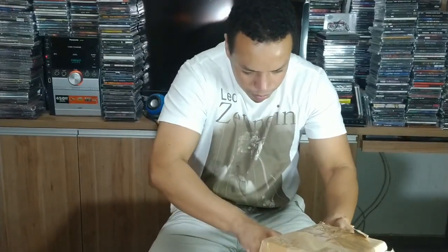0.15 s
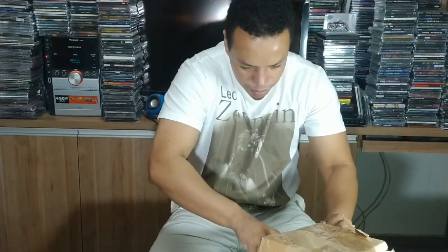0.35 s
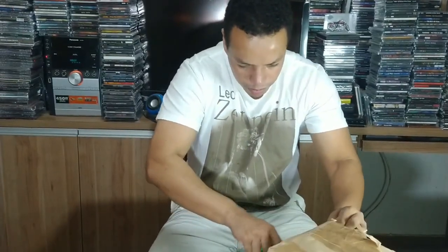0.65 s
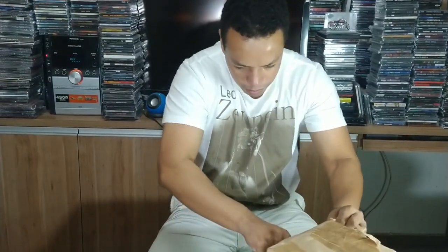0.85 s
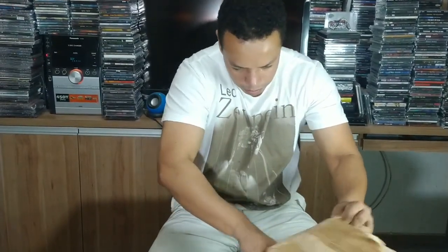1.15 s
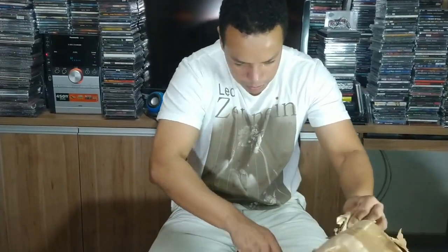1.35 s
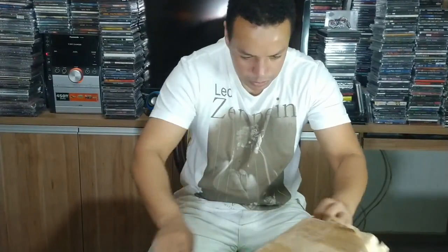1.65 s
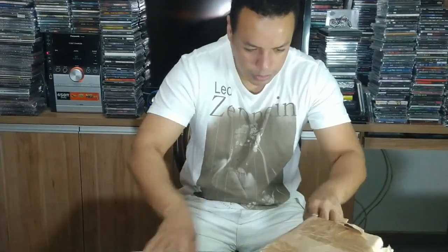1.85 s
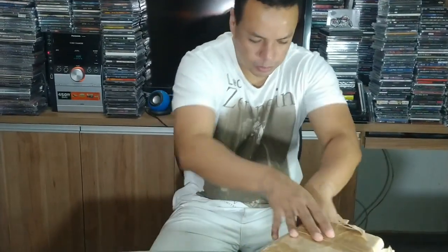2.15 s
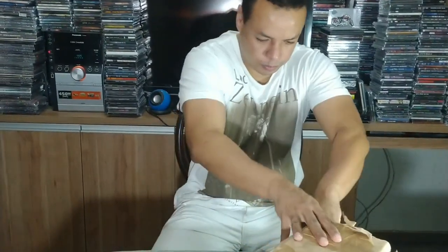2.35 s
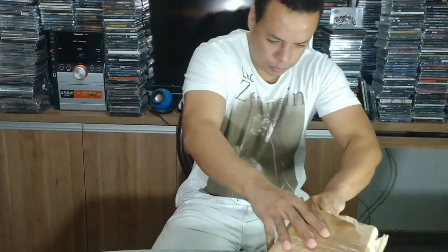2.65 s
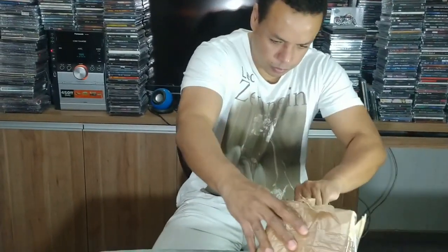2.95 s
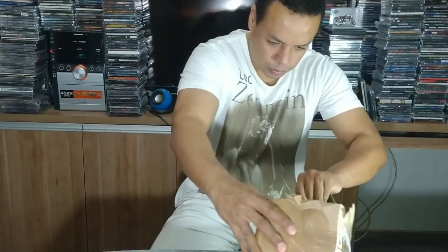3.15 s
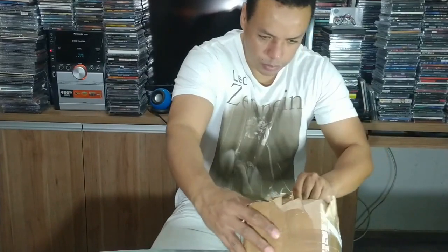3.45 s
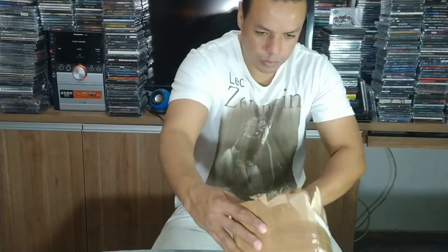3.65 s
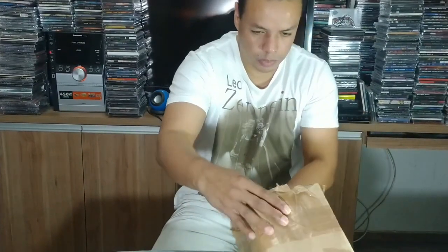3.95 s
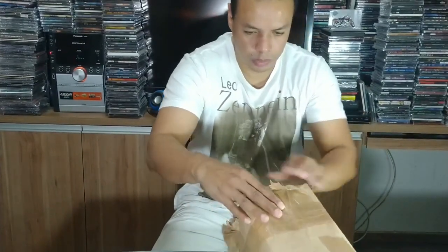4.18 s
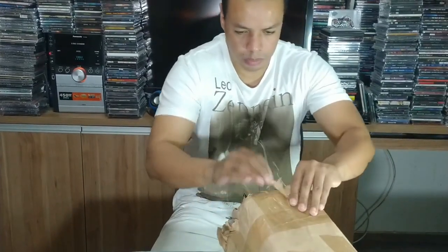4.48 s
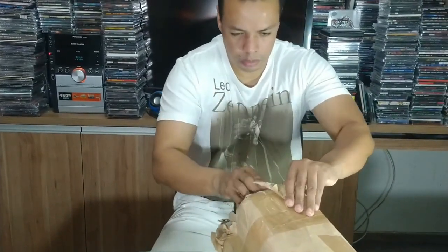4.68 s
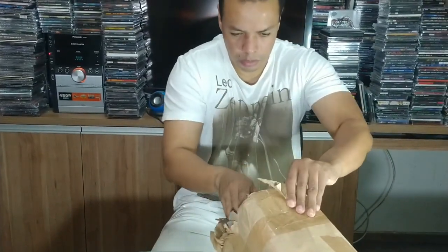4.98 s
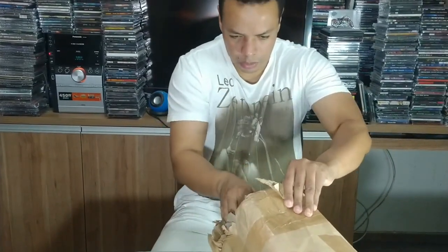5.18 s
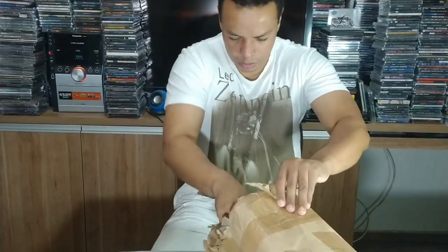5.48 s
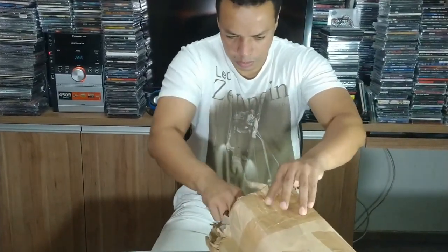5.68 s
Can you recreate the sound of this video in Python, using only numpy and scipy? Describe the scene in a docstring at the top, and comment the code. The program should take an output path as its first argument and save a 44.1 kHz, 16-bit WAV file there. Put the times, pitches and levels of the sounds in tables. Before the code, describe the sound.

In a small quiet room with a low appliance hum, thick wrapping paper is handled nearby. A few crisp ticks, one sharp pop and a dull jolt come first; near silence follows. Then loud tearing snaps, scattered softer rustling, and a dense closing burst of papery pops, in wide stereo with short reflections.

```python
"""Hands crinkle and tear brown paper off a parcel in a small, quiet room with a humming appliance.
Filtered noise and steady sines run throughout; early crinkling brings a hollow pop, then a short thudding jolt.
After a lull come the hardest snaps (brief rings with noise), then softer crackle (clumped grains of noise),
then a last flurry of snaps and buckling pops. Decaying noise echoes each sound in the room.
The camera widens its stereo by feeding each side, late and inverted, into the other."""
import sys
import numpy as np
from scipy import signal
from scipy.fft import rfft, irfft, next_fast_len
from scipy.io import wavfile
from scipy.ndimage import map_coordinates

SR = 44100
rng = np.random.default_rng(int(sys.argv[2]) if len(sys.argv) > 2 else 0)


def makeup_ratio(level_db):
    """Linear amplitude ratio for a level in decibels (20 dB per factor of ten)."""
    decades = np.asarray(level_db, float) / 20
    return 10 ** decades


def master(y):
    """Save y as 16-bit WAV."""
    cut = np.clip(np.atleast_2d(y).T, -1, 1)
    pcm = np.round(cut * 32767)  # scale
    wavfile.write(sys.argv[1], SR, pcm.astype(np.int16))


N = 256641


def unit(x):
    """Scaled to rms 1."""
    return x / np.sqrt(np.mean(x ** 2) + 1e-20)


def along(points, hz):
    """(Hz, value) points read on a log frequency axis."""
    point_hz, value = np.transpose(points)
    return np.interp(np.log(hz + 1), np.log(point_hz + 1), value)


def filtered(x, response):
    """x times a complex response of frequency."""
    m = next_fast_len(N + 8192)
    return irfft(rfft(x, m) * response(np.fft.rfftfreq(m, 1 / SR)), m)[..., :N]


def wander(nodes_per_s):
    """Smooth random curve through normal draws."""
    return map_coordinates(rng.standard_normal(N // 100), [np.arange(N) * nodes_per_s / SR])


def grains(spectrum, per_s, clump_db):
    """Tiny clicks of uneven size that come in clumps, rms 1."""
    hit = rng.random(N) < per_s / SR
    clicks = hit * rng.standard_normal(N) * makeup_ratio(clump_db * wander(60))
    return unit(filtered(clicks, lambda hz: makeup_ratio(along(spectrum, hz))))


def bursts(events, cycles, rough, edge, gain_db, crackle_s=0):
    """Each event rings a few cycles and may crackle on; too small a patch to radiate far below its pitch."""
    out, t = np.zeros(N + SR), np.arange(SR // 10) / SR
    for s, db, hz in events:
        ring = np.sin(2 * np.pi * hz * t) * np.exp(-t * hz / cycles)
        noise = rng.standard_normal(len(t)) * np.exp(-t / (cycles / hz + crackle_s))
        ring = ring + rough * noise
        highpass = signal.butter(4, edge * hz, "high", fs=SR, output="sos")
        lowpass = signal.butter(3, min(1.9 * hz, 17000), fs=SR, output="sos")
        ring = signal.sosfilt(lowpass, signal.sosfilt(highpass, ring))
        out[round(s * SR):][:len(t)] += makeup_ratio(db + gain_db) * ring / np.abs(ring).max()
    return out[:N]


# Room air spectrum. Each row: frequency in Hz, relative density in dB per Hz.
AIR = [(30, -46), (80, -44), (140, 14), (300, 7), (600, 12), (1200, -2.5), (2500, -4), (4500, -24),
       (9000, -56.5), (15500, -9)]
# Left-right likeness of the air. Each row: frequency in Hz, correlation from 0 to 1.
AIR_ALIKE = [(60, 0.217), (150, 0.17), (300, 0.66), (700, 0.116)]


def room_air():
    """Noise alike at both ports in part: mid and side shares set the correlation at each frequency."""
    def mid_side_gain(hz):
        angle = np.arccos(np.clip(along(AIR_ALIKE, hz), -1, 1)) / 2
        return makeup_ratio(along(AIR, hz)) * [np.cos(angle), np.sin(angle)]
    mid, side = filtered(rng.standard_normal((2, N)), mid_side_gain)
    return makeup_ratio(-66.0) * unit(np.array([mid + side, mid - side]))


# Appliance tones ahead of the ports. Each row: frequency in Hz, left rms in dB, right rms in dB,
# left phase lead in radians.
HUM = [(42.7, -88, -98, .3), (57.2, -70.5, -75, -1.5), (89.2, -87, -83, .3), (114.4, -81, -76, .3),
       (119.9, -78, -81, .3), (171.6, -66, -67, -.3), (178.7, -77, -69, -.5), (239.9, -77, -87, .3),
       (286, -72, -73, -.9), (343.2, -89, -85, .3), (514.8, -84, -84, .3), (850, -82, -82, .3),
       (972, -84, -84, .3)]


def appliance_hum():
    """Steady sines, each with its own level and phase per side."""
    t, hum = np.arange(N) / SR, np.zeros((2, N))
    for hz, left_db, right_db, lead_rad in HUM:
        phase = 2 * np.pi * (hz * t + rng.random()) + [[lead_rad], [0]]
        hum += makeup_ratio([[left_db], [right_db]]) * np.sqrt(2) * np.sin(phase)
    return hum


# Echo decay. Each row: frequency in Hz, t60 in seconds.
ROOM_T60 = [(200, 0.21), (800, 0.23), (3000, 0.22), (8000, 0.27), (15000, 0.29)]
# Left-right likeness of the echo. Each row: frequency in Hz, correlation from 0 to 1.
ECHO_ALIKE = [(250, .85), (700, .1)]


def room(x):
    """Walls answer after a few ms; as the hands move, every stretch gets its own echo pattern."""
    out, step = np.zeros((2, N + 2 * SR)), SR // 8
    for start in range(0, N, step):
        hz, t, z = signal.stft(rng.standard_normal((2, SR // 2)), SR, nperseg=256)
        alike = along(ECHO_ALIKE, hz)[:, None]
        z = np.array([z[0], alike * z[0] + np.sqrt(1 - alike ** 2) * z[1]])
        decay = makeup_ratio(-60 * t / along(ROOM_T60, hz)[:, None])
        tail = signal.istft(z * decay, SR, nperseg=256)[1]
        tail = tail * (1 - np.exp(-np.arange(tail.shape[1]) / SR / .005))  # 5 ms build-up
        wet = signal.fftconvolve(x[None, start:start + step], tail / np.linalg.norm(tail[0]), axes=1)
        out[:, start:start + wet.shape[1]] += wet
    return out[:, :N]


# Parcel knocked on the lap. Each row: start in seconds, relative peak in dB, pitch in Hz.
THUDS = [(0.656, -38.5, 297), (1.285, -27, 219), (1.297, -25, 261.4), (1.322, -32.5, 251), (2.6, -37, 344)]


def thuds():
    """Low, quickly damped rings with some noise."""
    return bursts(THUDS, cycles=1.8, rough=0.4, edge=0.7, gain_db=-3.5)


# Air pockets under the wrapping. Each row: start in seconds, relative peak in dB, pitch in Hz.
HOLLOWS = [(0.37, -56, 1008), (0.696, -24, 737), (0.704, -39, 670), (0.698, -27, 1534), (1.06, -49, 1680),
           (2.63, -33.5, 630.5), (2.679, -31, 760), (2.722, -32.5, 805), (2.912, -44.5, 1670),
           (2.976, -45, 835), (3.128, -41, 1240), (3.19, -46, 1204), (3.378, -29.5, 1923),
           (3.432, -39, 834), (3.85, -48, 1640), (3.985, -50, 632), (4.82, -56, 1002), (4.934, -40.5, 851),
           (4.938, -49, 623), (5.46, -38, 1270)]


def hollows():
    """Trapped air rings on for many cycles."""
    return bursts(HOLLOWS, cycles=9.1, rough=0.31, edge=0.89, gain_db=-0.5)


# Sheet buckling. Each row: start in seconds, relative peak in dB, pitch in Hz.
POPS = [(0.368, -49.5, 990), (0.6579, -34, 705), (0.6941, -11.5, 937), (0.718, -40, 1070),
        (1.2788, -33, 790), (1.286, -23.5, 940), (2.6163, -17, 743), (2.6629, -22, 715), (2.6776, -14, 750),
        (2.7201, -27, 805), (2.7685, -17.5, 942), (2.902, -38, 1420), (2.976, -47, 930),
        (3.1276, -29.5, 1380), (3.179, -27.5, 1577), (3.428, -22, 1255), (3.9908, -54, 670),
        (4.308, -58, 1130), (4.933, -37, 800), (5.4558, -20.5, 1560), (5.581, -25.5, 1290),
        (5.6268, -23.5, 1630), (5.66, -24.5, 1170), (5.6796, -16.5, 1410), (5.701, -12.5, 1375),
        (5.7567, -18.5, 1040), (5.812, -28, 803)]


def pops():
    """Buckling gives half-cycle decays, nearly free of noise."""
    return bursts(POPS, cycles=0.5, rough=0.06, edge=0.66, gain_db=-4.0)


# Handfuls crumpled or pulled. Each row: peak time in seconds, swell in seconds per 20 dB (8 ms at least),
# relative levels in dB of fibre crackle, crease rattle and sheet flutter.
CRUMPLES = [(0.022, 0.05, -64, -91, -85), (0.28, 0.01, -51.5, -68, -91), (0.36, 0.0149, -44, -47, -74),
            (0.49, 0.0244, -45.5, -71, -69), (0.56, -0.03, -62, -70, -78), (0.623, 0.03, -50, -57.5, -75),
            (0.659, 0.0124, -33, -33.5, -46.5), (0.68, 0.0179, -44, -42, -59.5),
            (0.698, 0.0014, -30.5, -25, -26.5), (0.72, -0.0046, -38.5, -40, -42),
            (0.76, -0.0152, -64, -45, -37), (1.07, 0.04, -52, -64, -65), (1.147, 0.0853, -45, -69, -99),
            (1.196, -0.01, -39.5, -83, -84), (1.292, 0.0231, -29, -34, -33),
            (1.308, 0.0145, -39, -38.5, -32.5), (1.357, 0.06, -54, -53.5, -61), (2.1, -0.2, -70, -89, -92),
            (2.304, 0.07, -49.5, -74.5, -78), (2.501, 0.13, -51.5, -57, -62),
            (2.532, 0.02, -51.5, -48, -56.5), (2.57, 0.05, -41, -48.5, -59), (2.607, 0.0215, -41, -36, -39),
            (2.622, -0.0041, -25.5, -24, -26.5), (2.684, 0.0267, -25.5, -26, -33.5),
            (2.775, -0.0013, -32.5, -35.5, -28), (2.907, 0.0262, -38.5, -42, -42),
            (2.939, 0.03, -40.5, -43.5, -55), (2.985, 0.0631, -39.5, -41.5, -53),
            (3.069, 0.026, -37.5, -40, -44.5), (3.126, 0.0151, -27, -35.5, -38.5),
            (3.186, 0.015, -30, -38, -31.5), (3.218, 0.0437, -45.5, -50, -43.5),
            (3.31, 0.2145, -45.5, -54, -61.5), (3.371, 0.004, -34, -45.5, -66),
            (3.392, 0.0631, -35, -39, -49.5), (3.435, 0.0213, -31.5, -33.5, -33),
            (3.68, 1.1, -57.5, -89.5, -87), (3.82, 0.22, -50, -63, -65.5), (3.862, 0.07, -43.5, -41.5, -78),
            (3.987, 0.02, -46.5, -49, -61.5), (4.1, 0.37, -54.5, -70, -80), (4.162, 0, -48, -57, -66),
            (4.225, 0.0349, -44.5, -58.5, -82), (4.315, -0.0329, -42, -45, -49),
            (4.351, -0.04, -42.5, -58, -68), (4.448, 0.03, -49, -60.5, -70),
            (4.617, -0.19, -62.5, -52, -56.5), (4.67, 0.03, -49, -74, -80), (4.86, 0, -53.5, -56.5, -62),
            (4.934, 0, -47, -43.5, -45), (4.966, 0.01, -51.5, -55, -67), (5.137, -0.05, -49, -54, -68),
            (5.19, 0.1, -56, -69.5, -72), (5.275, 0, -49, -59, -73), (5.327, 0.1, -51, -60, -83),
            (5.457, -0.02, -38.5, -43.5, -34.5), (5.489, 0, -40.5, -53, -34),
            (5.545, 0.06, -50.5, -53, -49.5), (5.586, -0.025, -41.5, -41, -29),
            (5.627, -0.02, -41, -37.5, -34), (5.694, 0.0524, -38, -36, -27),
            (5.746, 0.03, -35.5, -36.5, -28), (5.81, 0.03, -38, -28.5, -30)]
# Parcel merely held: relative levels in dB of fibres, creases and sheet.
REST_DB = (-80.5, -79.5, -76.5)


def handling():
    """Each handful swells to its peak and dies away more slowly; three relative levels in dB."""
    s, swell_s, *levels = np.transpose(CRUMPLES)[:, :, None]
    tails = (1.45, 1.73, 2.08)  # dying away over swell: fibres, creases, sheet
    t = np.arange(0, N + 64, 64) / SR
    away = (t - s) / np.maximum(swell_s, .008)
    curves = []
    for db, tail, rest_db in zip(levels, tails, REST_DB):
        drop_db = 20 * np.where(away < 0, -away, away / tail)
        power = makeup_ratio(2 * rest_db) + makeup_ratio(2 * (db - drop_db)).sum(0)
        curves.append(np.interp(np.arange(N) / SR, t, 10 * np.log10(power)))
    return curves


# Fibre grain spectrum. Each row: frequency in Hz, relative density in dB per Hz.
FIBRES = [(2500, -42.5), (5000, 0), (8000, 4.5), (10500, 7.5), (13000, -1.5), (15500, -7.5)]
# Crease grain spectrum. Each row: frequency in Hz, relative density in dB per Hz.
CREASES = [(1000, -20.5), (1900, -3.5), (2800, 4.5), (4500, 5.5), (7500, -5), (12000, -53.5)]
# Sheet resonance. Each row: multiple of its pitch, relative level in dB.
SHEET = [(.12, -92), (.3, -39.5), (.62, -9.5), (.85, -4.5), (1.1, -5), (1.6, -3.5), (4, -18.5), (9, -63)]
# Pitches the sheet moves among, in Hz.
SHEET_HZ = [600, 800, 1050, 1400, 1850, 2400]


def sheet_flutter():
    """Grains through a sheet resonance that follows the buckling pitch, by fading between fixed pitches."""
    pop_s, _, pop_hz = np.transpose(POPS)
    pitch_hz = np.interp(np.arange(N) / SR, pop_s, pop_hz)
    near = np.array([np.exp(-(np.log(pitch_hz / hz) / .2) ** 2) for hz in SHEET_HZ])
    near = near / np.linalg.norm(near, axis=0)
    flutter = np.zeros(N)
    for share, hz in zip(near, SHEET_HZ):
        spectrum = [(hz * multiple, db) for multiple, db in SHEET]
        flutter += share * grains(spectrum, per_s=800, clump_db=2)
    return flutter


def rustle():
    """Handling drives three sizes of grain: fibres, creases and the whole sheet."""
    fibre_db, crease_db, sheet_db = handling()
    fibres = makeup_ratio(fibre_db) * grains(FIBRES, per_s=4000, clump_db=3)
    creases = makeup_ratio(crease_db) * grains(CREASES, per_s=1400, clump_db=2.5)
    return fibres + creases + makeup_ratio(sheet_db) * sheet_flutter()


def small_snaps(count):
    """Lesser creases give way at random moments, as loud as the handling allows."""
    when = rng.random(count)
    size, pitch = rng.standard_normal((count, 2)).T
    fibre_db = handling()[0][(when * N).astype(int)]
    db = fibre_db + 6 + 3 * size
    hz = np.minimum(7000 * np.exp(.3 * pitch), 13000)
    return np.transpose([when * N / SR, db, hz])


# Loudest creases snapping. Each row: start in seconds, relative peak in dB, centre in Hz.
SNAPS = [(0.313, -32, 10900), (0.3275, -29, 10800), (0.335, -40, 10500), (0.3399, -24, 9100),
         (0.3832, -38, 3430), (0.4695, -33, 10500), (0.5395, -32, 11100), (0.5595, -30.5, 10700),
         (0.618, -33, 10100), (0.6628, -16.5, 3230), (0.6935, -15.5, 2640), (0.6987, -17.5, 4450),
         (1.068, -44, 5500), (1.184, -37.5, 10200), (1.301, -24, 3300), (1.363, -43, 3200),
         (1.8104, -35.5, 9900), (2.0906, -43, 10600), (2.4883, -38.5, 10000), (2.5274, -30.5, 3000),
         (2.5666, -18.5, 9650), (2.616, -20, 8900), (2.6205, -13.5, 2760), (2.6215, -12, 7700),
         (2.6767, -18, 2900), (2.682, -12.5, 4940), (2.9018, -37, 2850), (2.903, -25, 8060),
         (2.91, -25, 10400), (2.936, -40, 7800), (2.985, -28, 2950), (3.063, -30, 8250),
         (3.0677, -30, 3100), (3.124, -30, 5400), (3.1285, -20, 9400), (3.133, -25.5, 3400),
         (3.1793, -12.5, 8730), (3.184, -37, 5240), (3.1868, -24, 2820), (3.191, -35, 3320),
         (3.28, -27, 9500), (3.29, -31, 10000), (3.428, -22.5, 3930), (3.43, -9, 7700), (3.4338, -11, 5350),
         (3.437, -15.5, 4640), (3.444, -11, 5500), (4.188, -34, 5640), (4.283, -35.5, 6450),
         (4.3087, -34, 3220), (4.3126, -28, 6500), (4.326, -41, 7550), (4.349, -37, 8000),
         (4.489, -38, 8200), (4.6715, -48, 8350), (4.6893, -45, 9300), (4.7729, -26.5, 7350),
         (4.935, -30, 5140), (4.9402, -30, 4900), (4.989, -31, 6560), (5.1218, -34, 4870),
         (5.1355, -26.5, 5070), (5.181, -31, 8500), (5.1855, -28, 9200), (5.2716, -25, 3960),
         (5.322, -28.5, 5300), (5.455, -33, 2920), (5.481, -28, 2980), (5.581, -26, 2680),
         (5.659, -19, 2540), (5.671, -14, 3120), (5.7012, -12.5, 2850), (5.706, -11.5, 2640),
         (5.7562, -13, 2720)]


def snaps():
    """Creases give way: noisy rings of a few cycles that crackle on."""
    events = [*SNAPS, *small_snaps(count=110)]
    return bursts(events, cycles=2.75, rough=0.71, edge=0.66, gain_db=-2.5, crackle_s=.0007)


def direct(x):
    """The sounding spot wanders over the parcel, so either port may hear it first and louder."""
    lag, lean = wander(9), wander(9)
    side = np.array([[1], [-1]])
    read_at = np.arange(N) + .00007 * SR * side * lag
    return makeup_ratio(1.5 * side * lean) * map_coordinates(x, [read_at], mode="mirror")


def scene():
    """Paper close by, in its echo, over air and hum."""
    sharp = snaps() + pops() + hollows() + thuds()
    soft = rustle()
    echo = room(makeup_ratio(-0.5) * sharp + makeup_ratio(-3.0) * soft)
    return direct(sharp + makeup_ratio(-2.5) * soft) + echo + room_air() + appliance_hum()


# Left port against the right. Each row: frequency in Hz, gain in dB.
LEFT_PORT = [(200, 0.5), (600, -3.5), (8000, -2), (11000, -2.5), (15000, -1.5)]


def microphone_ports(x):
    """Left port coloured against the right; both roll off steeply at 15.5 kHz."""
    return filtered(x, lambda hz: makeup_ratio([along(LEFT_PORT, hz), 0 * hz]) / (1 + (hz / 15500) ** 60))


# Stereo widener. Each row: frequency in Hz, share fed across (ahead of the bass cut).
CROSS = [(100, 0.13), (300, 0.44), (700, 0.61), (3000, 0.84), (7000, 0.51), (10000, 0.2), (15000, 0.14)]


def widened(ports):
    """Each side, late and inverted, is fed into the other; the bass is left mostly uncrossed."""
    delay_s = 1 / 2175.5

    def crossing(hz):
        bass_cut = hz ** 4 / (hz ** 4 + 330 ** 4)
        share = np.clip(along(CROSS, hz), 0, 1)
        return share * bass_cut * np.exp(-2j * np.pi * hz * delay_s)
    return ports - filtered(ports[::-1], crossing)


def roll_off(x):
    """The treble ends steeply here."""
    return signal.sosfilt(signal.butter(12, 16260, fs=SR, output="sos"), x)


def record(dry):
    """Microphone ports, then the stereo widener."""
    mix = widened(microphone_ports(dry))
    return roll_off(mix)


dry = scene()
out = record(dry)
master(out)
```